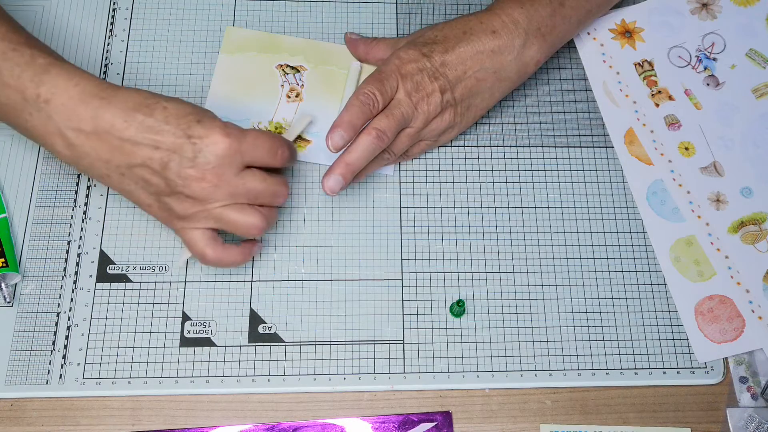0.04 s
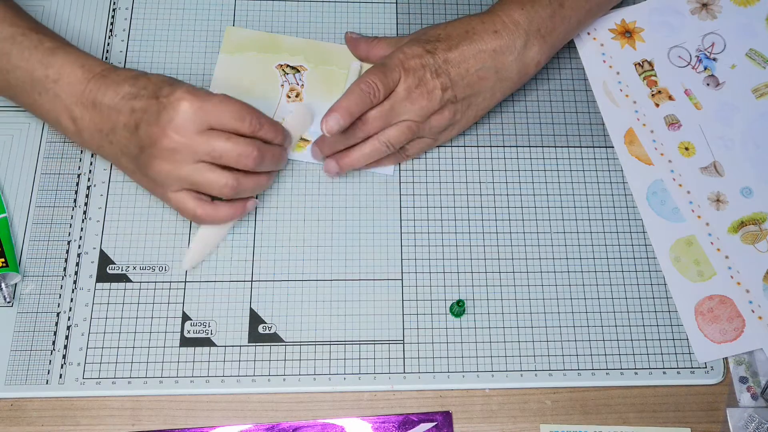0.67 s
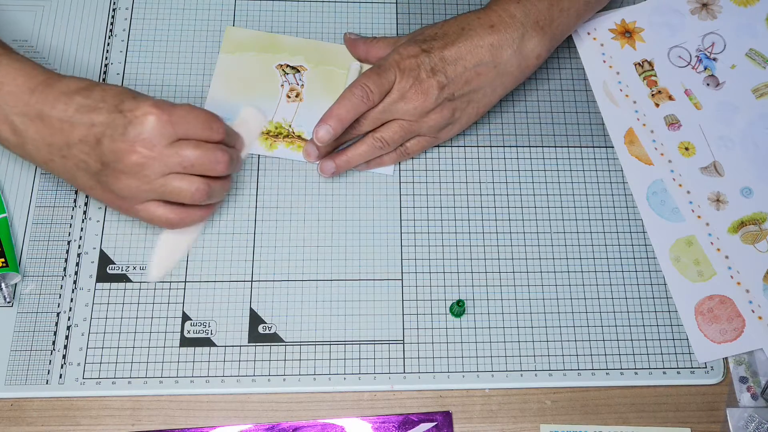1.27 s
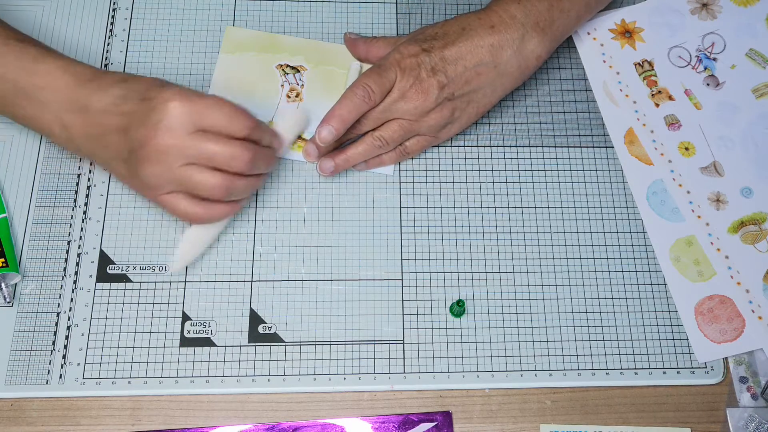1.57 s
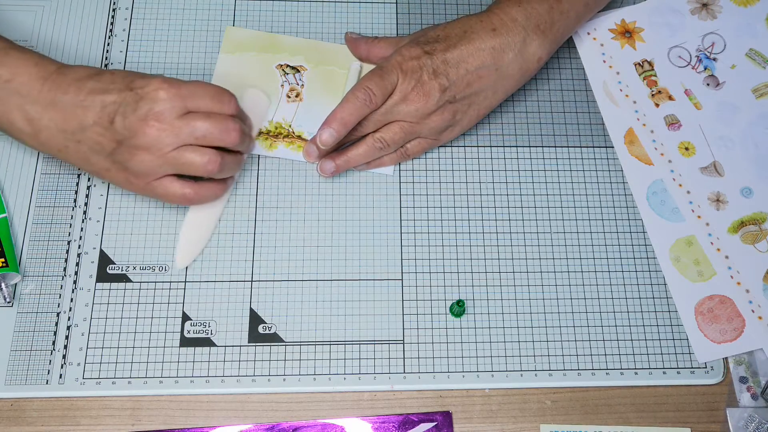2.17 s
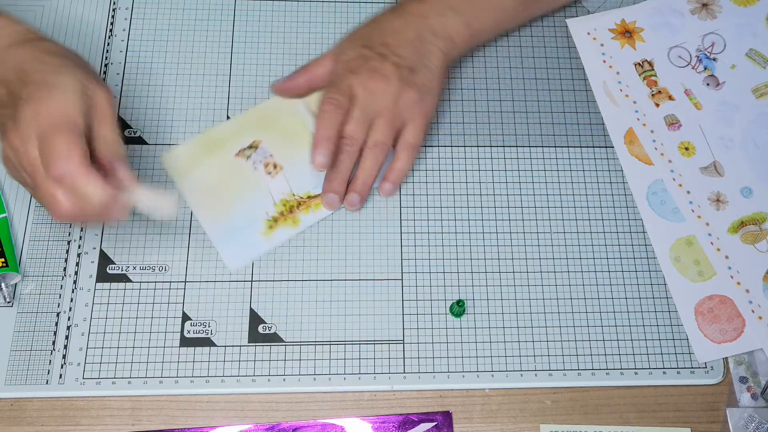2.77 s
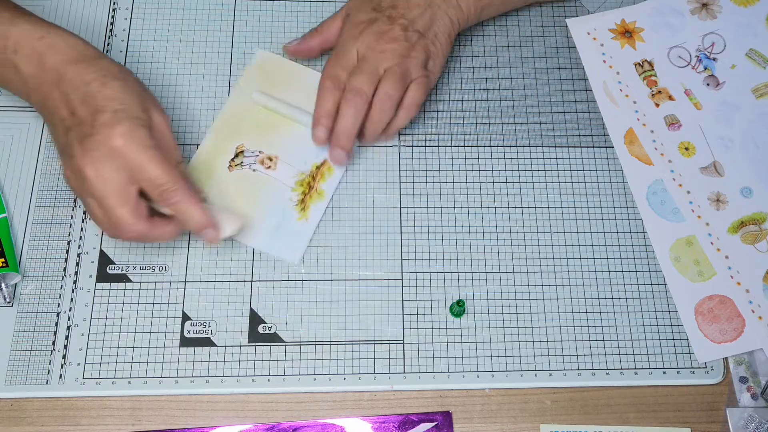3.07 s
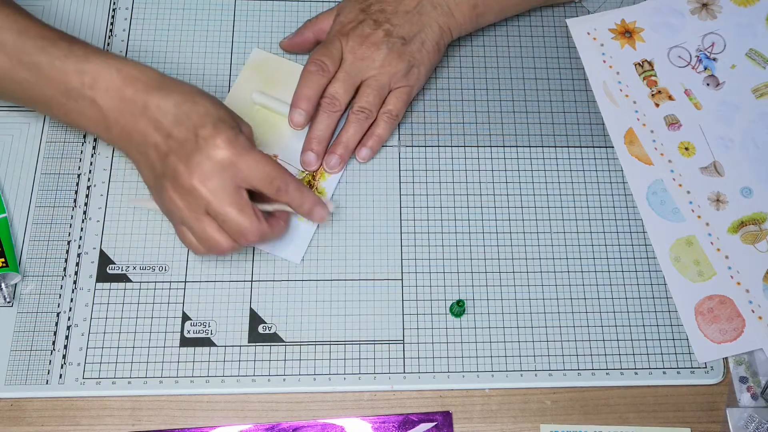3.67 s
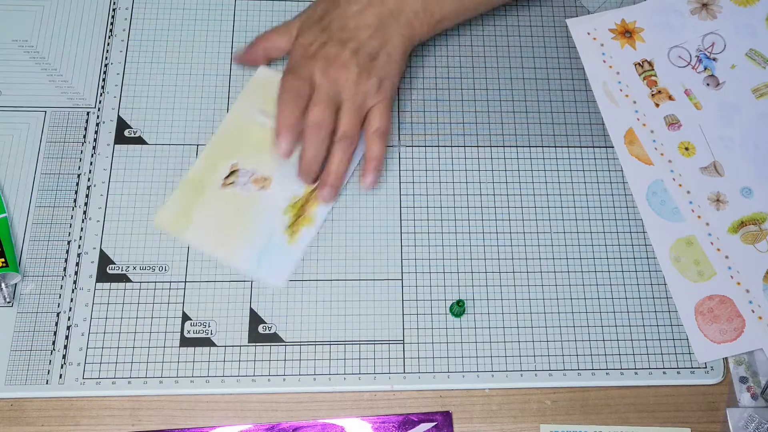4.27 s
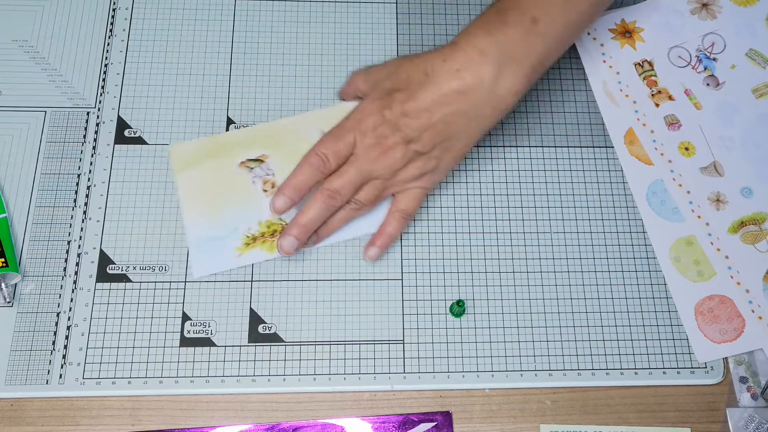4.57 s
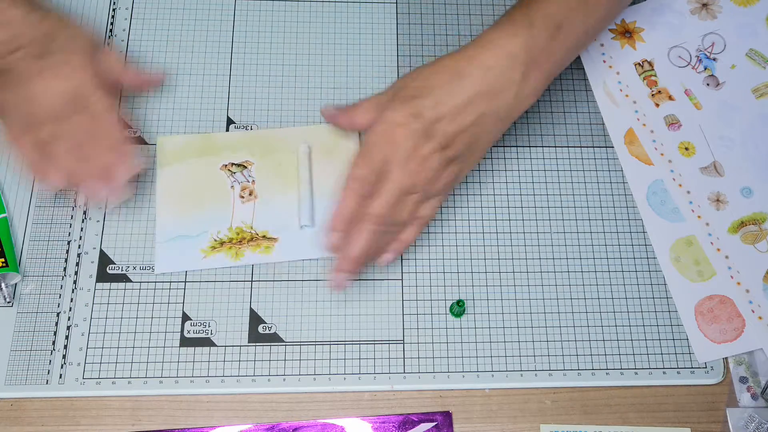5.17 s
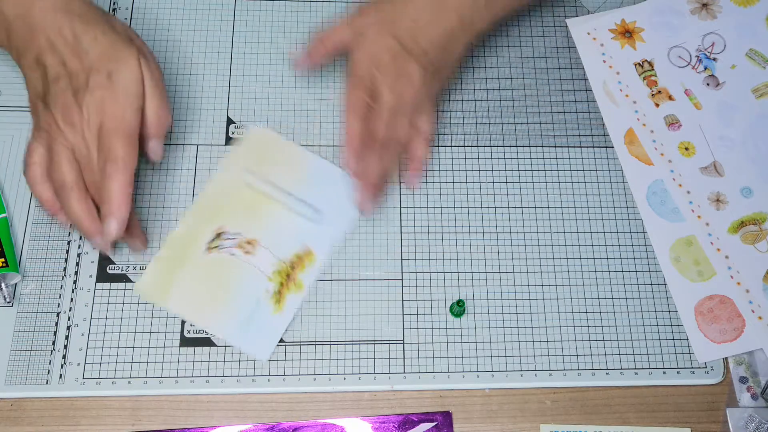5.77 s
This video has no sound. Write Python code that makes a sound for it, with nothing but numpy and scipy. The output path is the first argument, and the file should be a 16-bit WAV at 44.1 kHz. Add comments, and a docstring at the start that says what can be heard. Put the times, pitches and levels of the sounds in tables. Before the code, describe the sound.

A paper card is rubbed with a bone folder on a plastic mat, with soft hisses, light knocks and a few flaps.

```python
"""A desk in a small, lively room, the microphone close to a plastic cutting mat. A paper card is
burnished with a bone folder, then slid round and picked up. Paper hisses, scuffs and faintly whistles
as its fibres catch; nails tick, the hands rock the desk, fingers thud, the folder knocks the mat into
ringing and the card's edge flaps down. The room answers every knock over a faint steady background."""
import sys
import numpy as np
from scipy import signal
from scipy.fft import rfft, irfft
from scipy.io import wavfile
from scipy.ndimage import uniform_filter1d

SR = 44100
rng = np.random.default_rng(int(sys.argv[2]) if len(sys.argv) > 2 else 0)


def wav_record(signal):
    """Record a signal, one row per channel, as 16-bit PCM in the file named by sys.argv[1]."""
    frames = np.transpose(np.atleast_2d(signal))
    bounded = np.clip(frames, -1, 1)
    # unit amplitude maps onto the largest positive 16-bit level
    quanta = np.round(bounded * 32767).astype(np.int16)
    wavfile.write(sys.argv[1], SR, quanta)


N = 256662
SIZE = 8192  # samples in a filter or a short sound
FREQ = np.maximum(np.fft.rfftfreq(SIZE, 1 / SR), 1)
TIME, AGE = np.arange(N) / SR, np.arange(SIZE) / SR
LEAD_S = SIZE / SR  # a swelling sound starts this long before its peak
FROM_PEAK = TIME[:2 * SIZE] - LEAD_S


def undb(db):
    """Decibels to gain."""
    return 10 ** (np.asarray(db) / 20)

def unit(x):
    """Scale to rms 1."""
    return x / np.sqrt(np.mean(x ** 2))

def colour(points, hz=FREQ):
    """Gain of a spectrum drawn through (frequency [Hz], level [dB]) points."""
    f, db = np.transpose(points)
    return undb(np.interp(np.log(hz), np.log(f), db))

def peaks(modes):
    """Gain of a set of resonances."""
    return np.sqrt(sum(undb(2 * db) / (1 + (2 * (FREQ - hz) / width) ** 2) for hz, width, db in modes))

def damped(hz, t60, age):
    """One mode dying away."""
    return np.sin(2 * np.pi * hz * age) * np.exp(-np.log(1000) * age / t60)

def through(x, gain):
    """Filter each channel with a minimum-phase response, which starts at once."""
    cepstrum = irfft(np.log(gain + 1e-6))
    cepstrum[1:SIZE // 2] *= 2
    cepstrum[SIZE // 2 + 1:] = 0
    impulse = irfft(np.exp(rfft(cepstrum)))
    return signal.fftconvolve(x, impulse[None], axes=1)[:, :x.shape[1]]

def spread(mid_side, apart_hz, bass_width):
    """Mid and side to left and right: alike in the bass, unrelated above apart_hz."""
    mid, side = rfft(mid_side)
    width = np.clip(bass_width + (np.linspace(0, SR / 2, len(mid)) / apart_hz) ** 2, 0, 1)
    return irfft(np.array([mid + width * side, mid - width * side]) / np.sqrt(1 + width ** 2))

def add(out, s, x, db, pan_db=0):
    """Place a sound; db is its energy spread over 10 ms, pan_db is left minus right."""
    start = int(s * SR)
    gains = undb(db + np.array([[pan_db], [-pan_db]]) / 2)
    x = x * np.sqrt(SR / 100 / np.mean(np.sum(x ** 2, axis=1))) * gains
    x, start = x[:, max(-start, 0):], max(start, 0)
    out[:, start:start + x.shape[1]] += x[:, :N - start]


# room tone at the microphone: (frequency [Hz], relative level [dB])
ROOM_TONE = [(12, -29.5), (20, 4), (128, -3), (235, -10.5), (328, -5.5), (470, -5.5), (540, -9.5),
             (1080, -11), (1590, -13.5), (3460, -20), (3860, -20), (5850, -28.5), (8380, -69),
             (9900, -30.5), (15000, -93.5)]

def room_tone(db=-65.5):
    """Rumble and faint hiss from all round; the rumble swells and sinks a little."""
    f, knots = np.maximum(np.fft.rfftfreq(N, 1 / SR), 1), np.arange(0, N / SR, .06)
    white = spread(rng.standard_normal((2, N)), apart_hz=1600, bass_width=0.61)
    air = rfft(white) * colour(ROOM_TONE, f)
    low = 1 / (1 + (f / 200) ** 2)
    swell = undb(2.3 * np.interp(TIME, knots, rng.standard_normal(len(knots))))
    return unit(irfft(air * low) * swell + irfft(air * (1 - low))) * undb(db)


def friction(size, grain_db, patchy_db):
    """Paper fibres catch and let go: noise of uneven grains that comes in patches."""
    grains = np.repeat(rng.standard_normal(size // 16 + 1), 16)[:size]
    knots = np.arange(0, size / SR, .012)
    patches = np.interp(TIME[:size], knots, rng.standard_normal(len(knots)))
    white = spread(rng.standard_normal((2, size)), apart_hz=1500, bass_width=0.073)
    return white * undb(grain_db * grains + patchy_db * patches)

# sliding paper, heard close: (frequency [Hz], relative level [dB])
SLIDE_SPECTRUM = [(290, -46.5), (500, -29.5), (655, -42), (788, 1), (1540, -19.5), (1850, 0.5), (1990, -5),
                  (5540, 4), (8250, -2.5), (10800, -1), (15000, -17)]
# strokes of hand and card over the mat: (start [s], length [s], relative level [dB])
HAND_STROKES = [(0.195, 1, -83.5), (1.054, 0.5, -77.5), (1.91, 0.48, -76.5), (2.717, 0.17, -64.5),
                (2.927, 0.081, -71), (3.007, 1, -81.5), (3.732, 0.74, -80.5), (4.14, 0.515, -74.5),
                (5.29, 0.45, -81), (5.482, 0.16, -63.5)]

def sliding(attack_s=0.092, sag_db_per_s=9.5, release_s=0.05):
    """A soft friction hiss: each stroke gets up to speed, slows steadily and stops."""
    tone = colour(SLIDE_SPECTRUM) * FREQ / np.hypot(FREQ, 700)
    hiss = through(friction(N, grain_db=1.5, patchy_db=1.0), tone)
    power = undb(-88.5) ** 2  # resting hands still rustle a little
    for start, length, db in HAND_STROKES:
        age = np.maximum(TIME - start, 0)
        attack = np.minimum(age / attack_s, 1)
        release = np.exp(-np.maximum(age - length, 0) / release_s)
        power = power + (attack * undb(db - sag_db_per_s * age) * release) ** 2
    return unit(hiss) * np.sqrt(power) * undb(5)


# the mat lying on the desk: (frequency [Hz], width [Hz], relative level [dB])
MAT_RESONANCES = [(310, 14, 13.5), (608, 49, 17.5), (1065, 56, 16), (1429, 14, 18.5), (1870, 54, 11.5),
                  (2205, 17, 12), (2410, 140, 1.5), (2735, 19, 15), (2910, 5.7, 13.5), (3400, 22, -18.5),
                  (3220, 80, 5), (3685, 52, 12.5), (4300, 9.5, 10), (4360, 69, 7.5), (4600, 17, 6),
                  (5200, 110, 2.5), (5360, 20, 15.5), (5770, 10, 11), (7090, 290, 15)]

def mat(ring_db):
    """Gain of the mat's resonances over its dense modes; ring_db says how well a contact drives them."""
    return np.hypot(1, undb(ring_db) * peaks(MAT_RESONANCES))

# the dying ring and the scuffs, heard close: (frequency [Hz], relative level [dB])
RING_AND_SCUFF_SPECTRUM = [(150, -14.5), (450, -8.5), (700, -2), (1400, 3), (2400, 3.5), (3500, -1),
                           (7000, -13.5), (10500, -10), (13000, -26), (15000, -35.5)]
# a knock's ring dying away at the very start, then card and skin scuffing the mat:
# (peak time [s], level [dB], rise [s], fall [s], treble tilt [dB/octave])
RING_AND_SCUFFS = [(.01, -58.5, 0.014, 0.038, -5), (0.477, -55, 0.012, 0.017, 5),
                   (1.519, -49, 0.016, 0.015, 2), (2.712, -50, 0.024, 0.026, 5),
                   (2.954, -57.5, 0.021, .017, 4.5), (3.229, -64, 0.021, 0.017, 2.5),
                   (3.66, -52.5, 0.024, 0.24, -4), (3.831, -51, 0.13, 0.047, -0.5),
                   (4.045, -51.5, 0.017, 0.0094, -11.5), (4.06, -50, 0.035, 0.0099, 5),
                   (4.35, -52.5, 0.031, 0.022, 0.5), (5.545, -48.5, 0.014, 0.024, 6.5),
                   (5.576, -40.5, 0.014, 0.035, -1), (5.654, -54.5, 0.025, 0.063, 2)]

def ring_and_scuffs():
    """A knock's ring dies away, then scuffs swell and stop: grainy noise coloured by the mat."""
    out = np.zeros((2, N))
    body = colour(RING_AND_SCUFF_SPECTRUM) * mat(ring_db=-6.5) * FREQ / np.hypot(FREQ, 200)
    for s, db, rise, fall, tilt_db in RING_AND_SCUFFS:
        tilt = undb(tilt_db * np.log2(np.maximum(FREQ / 700, 1)))
        grainy = through(friction(2 * SIZE, grain_db=2, patchy_db=3.0), body * tilt)
        swell = np.exp(-np.maximum(-FROM_PEAK / rise, FROM_PEAK / fall))
        add(out, s - LEAD_S, grainy * swell, db, pan_db=-2.5)
    return out


def chatter(t60, size=SIZE, bass_width=0.22):
    """A contact and its dense rebounds: a burst with an even spectrum that dies away steadily."""
    fade = undb(-60 * TIME[:size] / t60)
    burst = rng.standard_normal((2, size)) * fade
    span = int(t60 * SR / 12) + 2
    for _ in range(3):  # even out the spectrum and the decay in turn
        spectrum = rfft(burst)
        even = irfft(spectrum / (np.abs(spectrum) + 1e-12))
        envelope = np.sqrt(np.abs(uniform_filter1d(even ** 2, span)) + 1e-14)
        burst = even / envelope * fade
    return spread(burst, apart_hz=1400, bass_width=bass_width)

def contact(cut_hz, order):
    """A softer contact lasts longer and loses the treble."""
    return 1 / np.sqrt(1 + (FREQ / cut_hz) ** (2 * order))

# the folder's tip, nails and paper, straight ahead: (time [s], level [dB], band centre [Hz])
TIP_TICKS = [(.087, -71, 4000), (.7093, -28, 5220), (1.7918, -70, 4300), (2.426, -68.5, 4190),
             (3.0, -62.5, 8100), (3.077, -66, 3200), (3.5034, -43, 4700), (5.5125, -60.5, 4300)]

def ticks(stray_count=6, stray_db=-79, stray_hz=8000):
    """Tiny hard contacts click, about an octave wide; fainter ones come by chance as fingers shift."""
    out = np.zeros((2, N))
    strays = [(when * N / SR, stray_db + 1 - 2 * softness, stray_hz)
              for when, softness in rng.random((stray_count, 2))]
    for s, db, hz in list(TIP_TICKS) + strays:
        band = 1 / (1 + (1.02 * (FREQ / hz - hz / FREQ)) ** 2)
        add(out, s, through(chatter(t60=0.013), contact(6100, 2.1) * band), db)
    return out


# the desk top under the mat: (frequency [Hz], t60 [s], relative level [dB])
DESK_RESONANCES = [(68, 0.092, 4), (129.6, 0.32, 0)]
# the hands lean on the desk: (time [s], relative level [dB], tilt [dB/octave])
DESK_BUMPS = [(0.179, -65, -17), (0.308, -62.5, -5), (0.716, -53, 20), (1.79, -56.5, -24),
              (2.732, -59.5, 21), (3.51, -62, -13), (4.383, -56, 3), (4.589, -65, -8), (4.856, -62, 20),
              (5.57, -59, -12.5)]

def desk_bumps(rise_s=0.015):
    """The hands' weight rocks the desk top briefly; a slow lean favours the low mode."""
    out, age = np.zeros((2, N)), TIME[:SR // 2]
    for s, db, tilt_db in DESK_BUMPS:
        swing = sum(undb(mode_db + tilt_db * np.log2(hz)) * damped(hz, t60, age)
                    for hz, t60, mode_db in DESK_RESONANCES)
        add(out, s, swing[None] * (1 - np.exp(-age / rise_s)), db + 3.5)
    return out


# rubbed paper, close and dry: (peak time [s], half length [s], level [dB], pitch [Hz])
PAPER_SQUEAKS = [(0.308, 0.11, -63, 3830), (0.317, 0.0034, -62.5, 3880), (1.196, 0.025, -61.5, 3800),
                 (1.394, 0.17, -60, 3630), (3.338, 0.14, -72.5, 5980), (3.953, 0.13, -57, 1060),
                 (5.377, 0.063, -62.5, 6020), (5.64, 0.073, -50, 1970)]

def squeaks():
    """Rubbing sticks and slips at a loose rate: a faint, breathy whistle."""
    out = np.zeros((2, N))
    for s, half_length, db, hz in PAPER_SQUEAKS:
        width_hz = 155 + 0.0092 * hz
        whistle = through(friction(2 * SIZE, grain_db=3.0, patchy_db=1.5), peaks([(hz, width_hz, 0)]) ** 2)
        swell = np.exp(-(FROM_PEAK / half_length) ** 2 / 2)
        add(out, s - LEAD_S, whistle * swell, db)
    return out


# fingers on the mat, right of the microphone: (time [s], level [dB], push time [s])
FINGER_PRESSES = [(.474, -40, 0.0015), (1.213, -61.5, 0.0056), (1.511, -50.5, 0.00086),
                  (1.792, -65, 0.0012), (2.426, -59.5, 0.0015), (2.459, -61.5, 0.002),
                  (3.5045, -30.5, 0.0014), (4.0195, -59, 0.00073), (5.5116, -63.5, 0.00026)]

def presses(swing_hz=684, overtone_hz=1400, reflection_s=0.015):
    """A padded push swings the mat for a few cycles and damps its ring; a weak reflection follows."""
    out = np.zeros((2, N))
    body = mat(ring_db=-19)
    low_ring = undb(-28.5) * damped(hz=304, t60=0.13, age=AGE)
    for s, db, push_s in FINGER_PRESSES:
        push = (AGE / push_s) ** 2 * np.exp(-AGE / push_s)
        swing = np.sin(2 * np.pi * swing_hz * AGE) * push
        overtone = undb(-14) * np.sin(2 * np.pi * overtone_hz * AGE) * push
        reflection = undb(-7.5) * np.roll(swing, int(reflection_s * SR))
        thud = swing + overtone + reflection + low_ring
        add(out, s, through(thud[None], body), db, pan_db=-3.5)
    return out


def spot(node_hz, depth_db):
    """Modes with a node at the struck spot stay weak: dips at multiples of node_hz (peaks if depth < 0)."""
    return undb(-depth_db * np.cos(np.pi * FREQ / node_hz) ** 4 * np.minimum(1, FREQ / node_hz))

def strike(near, far, s, db, tone, t60, pan_db, room_db):
    """One blow: near goes straight to the microphone, far goes into the room."""
    burst = chatter(t60)
    add(near, s, through(burst, tone), db, pan_db)
    # the room gathers sound from all directions, which evens out the resonances
    all_round = np.sqrt(tone * uniform_filter1d(tone, size=60))
    add(far, s, through(burst, all_round), db + room_db)

# the bone folder: (frequency [Hz], width [Hz], relative level [dB])
FOLDER_RESONANCES = [(698, 66, 3.5), (1450, 70, 4.5), (2160, 34, -18.5), (2370, 60, -6.5), (2747, 70, -19),
                     (2860, 41, 0), (3900, 90, -4), (4320, 103, -2)]
# a knock, heard close: (frequency [Hz], relative level [dB])
KNOCK_SPECTRUM = [(60, -35.5), (200, -21.5), (450, -29), (650, -8), (1000, -1.5), (1600, -3.5), (2400, 4.5),
                  (3700, 0.5), (5400, 0.5), (7000, -12.5), (8500, -14.5), (10800, -5.5), (12500, -34),
                  (15000, -33)]
# folder on the mat, just right of centre: (time [s], level [dB], cut-off [Hz], roll-off order [-],
# chatter t60 [s], node [Hz], node depth [dB], relative folder ring [dB])
FOLDER_KNOCKS = [(0.5348, -36.5, 3460, 5, 0.042, 1410, 3.5, -5),
                 (0.5429, -44.5, 2600, 5, 0.02, 2070, 20, -10),
                 (0.707, -22.5, 9000, 3, .053, 1590, -3.5, -21.5),
                 (1.5101, -39, 2150, 1.8, 0.069, 1874, 16.5, -32),
                 (1.9044, -31.5, 4160, 1.6, 0.041, 1790, 3.5, -14.5),
                 (2.2838, -48.5, 3380, 2, .07, 1840, 16, 7.5),
                 (2.705, -49.5, 1644, 3, 0.087, 1755, 6.5, 15.5),
                 (3.5035, -32.5, 2100, 2.3, 0.087, 3180, 11, -19)]

def folder_knocks(near, far):
    """Mat and folder ring together; the harder the contact, the more it radiates into the room."""
    for s, db, cut_hz, order, t60, node_hz, depth_db, ring_db in FOLDER_KNOCKS:
        folder = undb(ring_db + 9) * peaks(FOLDER_RESONANCES)
        body = np.hypot(mat(ring_db=-0.5) * spot(node_hz, depth_db), folder)
        tone = colour(KNOCK_SPECTRUM) * body * contact(cut_hz, order)
        room_db = -4.5 + 1.74 * np.log2(cut_hz / 4850)
        strike(near, far, s, db, tone, t60, pan_db=-0.5, room_db=room_db)


# the card lying on the mat: (frequency [Hz], width [Hz], level above the dense modes [dB])
CARD_RESONANCES = [(445, 13, 14), (672, 29, 16.5), (978, 14, 16.5), (1174, 6, 19), (1365, 110, 11),
                   (1796, 33, 14.5), (2163, 19, 11.5), (2530, 33, 5), (2640, 24, 0), (2920, 19, 16),
                   (2995, 19, -18), (4230, 27, -8), (5030, 25, 9)]
# a flap, heard close: (frequency [Hz], relative level [dB])
FLAP_SPECTRUM = [(100, -35), (300, -19.5), (500, -17.5), (680, -9), (1400, -6), (2700, 0), (3700, -6),
                 (5400, -3.5), (8400, -14.5), (10600, -12.5), (12500, -26), (15000, -33)]
# the card's edge, to either side of the microphone: (time [s], level [dB], cut-off [Hz],
# flutter t60 [s], node [Hz], node depth [dB], left minus right [dB])
CARD_FLAPS = [(4.736, -40, 5600, 0.071, 1660, 7, -4), (4.853, -30, 6200, 0.041, 4500, 2.5, -4),
              (4.860, -31, 11000, 0.082, 3430, -7, 7.5), (4.8671, -31.5, 12400, 0.066, 1670, 4, -8),
              (5.0551, -36, 6330, 0.084, 4000, -6, -1.5), (5.0659, -40, 5500, 0.071, 2900, 16, -4)]

def card_flaps(near, far):
    """The edge flaps down and flutters, ringing the card's modes."""
    for s, db, cut_hz, t60, node_hz, depth_db, pan_db in CARD_FLAPS:
        body = np.hypot(1, peaks(CARD_RESONANCES)) * spot(node_hz, depth_db)
        tone = colour(FLAP_SPECTRUM) * body * contact(cut_hz, order=1.8)
        strike(near, far, s, db, tone, t60, pan_db, room_db=-3.5)


# the small room round the desk: (frequency [Hz], t60 [s], relative level [dB])
ROOM_BANDS = [(146, 0.33, 12), (580, 0.54, 1.5), (1205, 0.77, -4.5), (2680, 0.59, -0.5), (5400, 0.77, -7.5),
              (8050, .48, -3.5), (13000, 0.27, -1)]

def room(x, build_s=0.00089):
    """Diffuse echoes build up quickly and die soonest in the bass and the top treble."""
    hz, t60, db = np.transpose(ROOM_BANDS)
    age, f = TIME[:SR], np.fft.rfftfreq(SR, 1 / SR)
    echoes, tail = rfft(chatter(max(t60), size=SR, bass_width=0.099)), 0
    for share, band_t60, band_db in zip(np.eye(len(hz)), t60, db):
        band = irfft(echoes * np.interp(f, hz, share), SR)
        absorbed = np.exp(-np.log(1000) * age * (1 / band_t60 - 1 / max(t60)))
        tail = tail + band * absorbed * undb(band_db)
    tail *= 1 - np.exp(-(age / build_s) ** 2)
    tail *= 1 - (age / age[-1]) ** 10  # the tail closes in silence
    return signal.fftconvolve(x, unit(tail) / np.sqrt(SR), axes=1)[:, :N]


def scene():
    """At the microphone: the handling up close, the echoes and room tone behind it."""
    near, far = np.zeros((2, 2, N))
    folder_knocks(near, far)
    card_flaps(near, far)
    thuds = presses()
    light_sounds = ticks() + sliding() + ring_and_scuffs()
    near += thuds + light_sounds + squeaks() + desk_bumps()
    far += undb(-11) * thuds + undb(-8.5) * light_sounds
    return near + room(far) + room_tone()

def record(dry):
    """The recorder cuts the top steeply."""
    top_hz = 15300
    return signal.sosfilt(signal.ellip(8, .2, 70, top_hz, fs=SR, output="sos"), dry)


dry = scene()
out = record(dry)
wav_record(out)
```